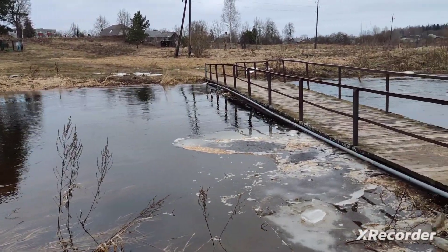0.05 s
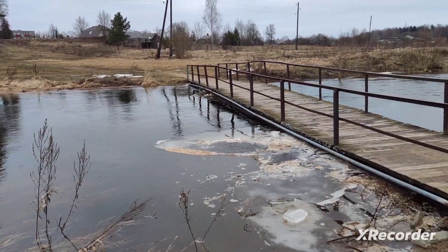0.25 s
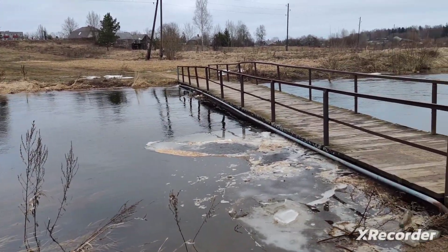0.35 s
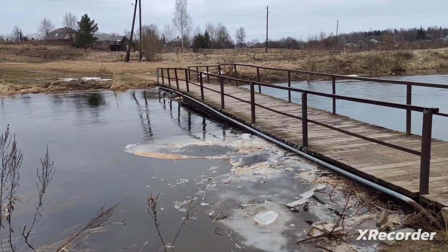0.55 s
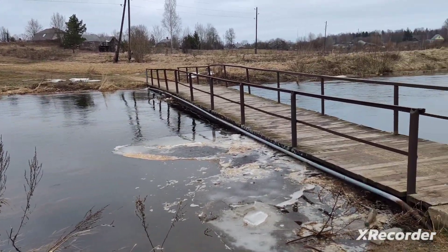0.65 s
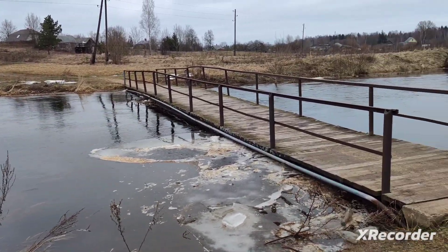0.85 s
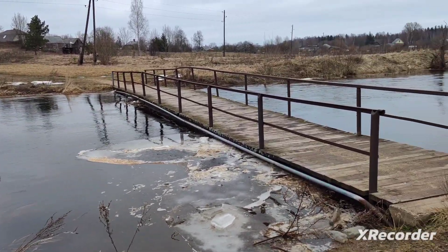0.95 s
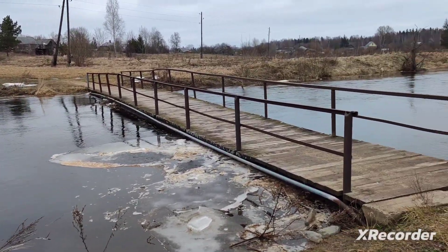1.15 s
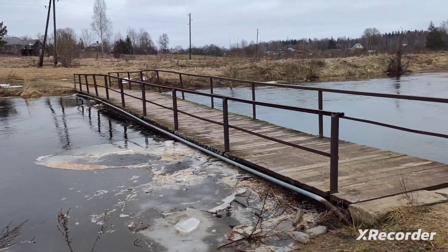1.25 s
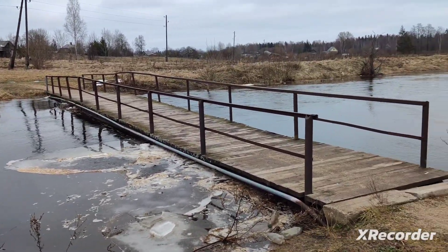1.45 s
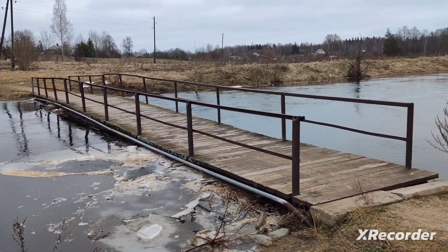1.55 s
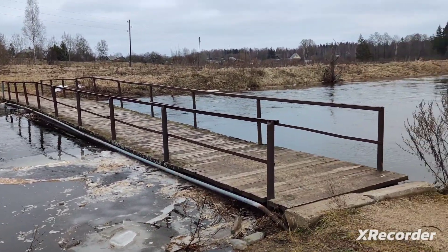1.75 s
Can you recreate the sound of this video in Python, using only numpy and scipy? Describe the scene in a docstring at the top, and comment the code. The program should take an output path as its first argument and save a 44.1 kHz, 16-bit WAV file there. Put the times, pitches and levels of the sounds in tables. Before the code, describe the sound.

A river flows past a footbridge with a soft, even rush and a few faint laps and bubbles. A wind gust rumbles and thumps on the microphone, moving from left to right, then eases, leaving the water.

```python
"""At a footbridge, a swollen river slides past: a soft, even rush of broadband noise, with a few
faint laps and tiny bubbles that ring as damped oscillators. A gust crosses the microphone from
the left port to the right; its turbulent pressure rumbles, and its eddies strike the ports as
brief thumps. A thin hiss lies under it all."""
import sys
import numpy as np
from scipy import signal
from scipy.fft import rfft, irfft, next_fast_len
from scipy.io import wavfile
from scipy.ndimage import uniform_filter1d, map_coordinates

SR = 44100
rng = np.random.default_rng(int(sys.argv[2]) if len(sys.argv) > 2 else 0)


def transcribe(signal):
    """Save signal, clipped to [-1, 1], as a 16-bit WAV file at the path in sys.argv[1]."""
    frames = np.atleast_2d(signal).T
    limited = np.clip(frames, -1, 1)
    pcm = np.round(limited * 32767).astype(np.int16)
    wavfile.write(sys.argv[1], SR, pcm)


N = 79380
TIME = np.arange(N) / SR

# Spectra of the hiss and the water (frequency [Hz], relative spectral density [dB])
HISS_SPECTRUM = [(1000, -5.5), (7500, -7.5), (9000, -5), (12000, -4), (15500, -3)]
CURRENT_SPECTRUM = [(40, -10), (140, 2.9), (195, 8.4), (230, 4.62), (280, 7), (370, 1), (500, 0),
                    (750, -.5), (1000, -2.3), (1500, -6.5), (1900, -9.5), (2300, -15), (3200, -22),
                    (4500, -26), (8000, -38)]
RIPPLE_SPECTRUM = [(400, -29.5), (1200, -5.5), (2000, 9), (2900, 2), (3600, -1), (5000, -17.5), (9000, -57)]
FIZZ_SPECTRUM = [(1000, -5), (3000, -3), (4600, -2), (5600, -0.5), (6400, 0.5), (6900, -4.5), (7400, -12.5),
                 (9000, -46.5)]
# Envelopes of the hiss, the ripples near the bank and the fizz (time [s], level [dB])
HISS_ENVELOPE = [(0, -68.5), (.3, -71), (.45, -71), (.66, -69), (.8, -70.5), (1, -71), (1.25, -69.7),
                 (1.8, -70.5)]
RIPPLE_ENVELOPE = [(0, -76), (.25, -71.5), (.45, -70.5), (.72, -74.5), (.9, -73.5), (1.33, -74), (1.5, -77),
                   (1.8, -87)]
FIZZ_ENVELOPE = [(0, -65.5), (.07, -70), (.5, -72), (.9, -73), (1.02, -72), (1.12, -69.5), (1.24, -71),
                 (1.4, -72.5), (1.52, -70.5), (1.63, -70.5), (1.72, -72.5), (1.8, -73)]
# Slow swell of the current (time [s], gain [dB])
CURRENT_SWELL = [(0, 0), (.5, 0.53), (.9, 0.03), (1.33, 1), (1.5, -1), (1.8, -0.5)]
# Likeness of the water's sound at the two ears (frequency [Hz], correlation [0-1])
WATER_CORRELATION = [(100, 0.8), (290, 0.96), (640, 0.17), (1400, 0.022), (3000, 0.14), (7000, 0.045)]
# Laps near the bank (peak time [s], relative level [dB], centre frequency [Hz], rise time [s])
BANK_LAPS = [(0.235, -54.5, 2160, 0.0038), (0.712, -57, 2640, 0.0044), (1.004, -57.5, 3220, 0.0026),
             (1.339, -58, 2000, 0.0098), (1.619, -51, 1020, 0.0034)]
# Spectra of the wind's turbulent pressure (frequency [Hz], relative spectral density [dB])
SWAY_SPECTRUM = [(8, -12), (30, -2), (45, -7.5), (80, -9), (300, -61.5), (1000, -120)]
RUMBLE_SPECTRUM = [(10, -2), (25, -3), (50, 7), (75, 4), (110, 2), (175, -7.5), (250, -21.5), (350, -32),
                   (550, -42), (1500, -120)]
FLUTTER_SPECTRUM = [(50, -13), (105, -6.5), (180, 17.5), (260, -3.5), (380, -20.5), (520, -32.5),
                    (750, -48), (1500, -120)]
RASP_SPECTRUM = [(120, -25.5), (230, -8), (300, 5), (400, -8.5), (520, -24.5), (720, -22), (900, -37.5),
                 (2000, -120)]
# Envelope of the rumble at each port (time [s], level [dB])
RUMBLE_LEFT = [(0, -40.5), (.12, -53), (.19, -34), (.265, -39), (.31, -28.5), (.36, -42.5), (.405, -26),
               (.46, -28.5), (.49, -37), (.535, -19.5), (.575, -32.5), (.62, -24.5), (.68, -43.5),
               (.71, -30), (.76, -44.5), (.95, -48), (1.04, -36.5), (1.11, -47), (1.33, -46.5), (1.43, -39),
               (1.6, -52), (1.8, -50)]
RUMBLE_RIGHT = [(0, -64), (.08, -40.5), (.22, -48), (.33, -46), (.47, -45.5), (.56, -38.5), (.63, -36),
                (.66, -36), (.69, -34), (.745, -35.5), (.8, -43.5), (1.05, -54), (1.3, -47), (1.4, -47.5),
                (1.5, -41), (1.6, -47.5), (1.71, -51), (1.8, -50)]
# Eddies striking the ports (time [s], thump peak [dB], centre frequency [Hz],
# Gaussian half-width [s], rasp level [dB], port [0 left, 1 right])
EDDY_STRIKES = [(0.241, -28.5, 97, 0.0061, -49, 0), (0.301, -22.5, 118, 0.0046, -51, 0),
                (.414, -21.5, 54.6, 0.0064, -47, 0), (0.439, -7, 175.6, 0.0029, -37, 0),
                (0.5013, -16.5, 147, 0.0039, -42, 0), (0.5133, -15, 200.3, 0.0061, -25.5, 0),
                (0.5475, -12.5, 95, 0.0047, -33.5, 0), (0.5641, -19, 136, 0.0056, -50, 0),
                (0.597, -17, 92, 0.011, -53, 0), (0.651, -25.5, 139.5, 0.0042, -48, 1),
                (0.663, -17.5, 113, 0.0014, -53, 0), (0.679, -20.5, 127, 0.0061, -36, 1),
                (0.698, -21, 121, 0.002, -39, 1), (.859, -27.5, 95, 0.0032, -62, 0),
                (1.342, -28.5, 158, 0.0012, -52, 0)]


def amp(db):
    """Amplitude grows tenfold for every 20 dB."""
    return 10 ** (np.asarray(db) / 20)


def unit(x):
    """Normalisation to an rms of 1."""
    return x / np.sqrt(np.mean(x ** 2) + 1e-20)


def pan(db):
    """Interaural level difference: the left gains db and the right loses as much."""
    return amp([[db], [-db]])


def along(points, hz):
    """Interpolation of (frequency, value) points on a logarithmic frequency axis."""
    frequencies, values = np.transpose(points)
    return np.interp(np.log(hz + 1), np.log(frequencies + 1), values)


def envelope(points):
    """Linear interpolation of (time, level) points at every sample."""
    return np.interp(TIME, *np.transpose(points))


def wobble(knots_per_s):
    """Spline interpolation of random knots gives a smooth fluctuation."""
    return map_coordinates(rng.standard_normal(400), [TIME * knots_per_s], mode="mirror")


def filtered(x, response):
    """Linear filtering multiplies the spectrum by a frequency response."""
    size = next_fast_len(N + 8192)
    return irfft(rfft(x, size) * response(np.fft.rfftfreq(size, 1 / SR)), size)[..., :N]


def rush(spectrum, correlation, patchy_db):
    """Noise with random patches of gain; its mid-to-side ratio sets the interaural correlation."""
    cells = signal.stft(rng.standard_normal((2, N)), nperseg=512)[2]
    patches = uniform_filter1d(rng.standard_normal(cells.shape[1:]), size=5, axis=0)  # over frequency
    patches = uniform_filter1d(patches, size=10, axis=1)  # over time
    pair = signal.istft(cells * amp(patchy_db * unit(patches)), nperseg=512)[1][:, :N]

    def response(hz):
        angle = np.arccos(np.clip(along(correlation, hz), -1, 1)) / 2
        return amp(along(spectrum, hz)) * np.array([np.cos(angle), np.sin(angle)])

    mid, side = filtered(pair, response)
    return unit(np.array([mid + side, mid - side]))


def turbulence(spectrum, steady_s=0.042):
    """Random pressure fluctuation, divided by its running rms so that its level stays steady."""
    noise = unit(filtered(rng.standard_normal(N), lambda hz: amp(along(spectrum, hz))))
    span = int(steady_s * SR)
    power = uniform_filter1d(uniform_filter1d(noise ** 2, span), span // 2)
    return unit(noise / np.sqrt(np.abs(power) + 1e-6))


def hiss():
    """Thin noise, almost uncorrelated between the ears, is heard as diffuse."""
    noise = rush(HISS_SPECTRUM, correlation=[(5000, 0.0098)], patchy_db=0.5)
    return amp(envelope(HISS_ENVELOPE)) * pan(0.5) * noise


def river():
    """Incoherent sources add in power: the broad rush of the current, ripples and a fine fizz."""
    current = amp(-55 + envelope(CURRENT_SWELL)) * rush(CURRENT_SPECTRUM, WATER_CORRELATION, 1.5)
    ripples = amp(envelope(RIPPLE_ENVELOPE)) * rush(RIPPLE_SPECTRUM, WATER_CORRELATION, 3)
    fizz = amp(envelope(FIZZ_ENVELOPE)) * rush(FIZZ_SPECTRUM, WATER_CORRELATION, 1.85)
    return pan(0.22) * current + ripples + pan(1.9) * fizz


def bubbles(count=320, typical_db=-73.5, typical_hz=1323, decay_cycles=6.5, pitch_rise=0.13):
    """Each bubble is a damped oscillator that rings for a few cycles as its pitch rises."""
    out = np.zeros((2, N + SR))
    t = np.arange(SR // 20) / SR
    starts = rng.integers(0, N, count)
    for start, (pitch, strength, side) in zip(starts, rng.standard_normal((count, 3))):
        cycles = t * typical_hz * np.exp(.45 * pitch)
        age = cycles / decay_cycles
        phase = 2 * np.pi * cycles * (1 + pitch_rise * np.tanh(age / 2))
        ring = np.sin(phase) * np.exp(-age) * (1 - np.exp(-cycles))
        out[:, start:start + len(t)] += amp(typical_db + 2.2 * strength) * pan(side) * ring
    return out[:, :N]


def laps(log_bandwidth=0.28):
    """Each lap is a transient of band-limited noise, largely coherent between the ears."""
    out = np.zeros((2, N))
    for peak_s, db, centre_hz, rise_s in BANK_LAPS:
        age = np.maximum((TIME - peak_s) / rise_s + 1, 0)
        band = lambda hz: np.exp(-.5 * (np.log((hz + 1) / centre_hz) / log_bandwidth) ** 2)
        noise = rng.standard_normal(N) + 0.32 * rng.standard_normal((2, N))
        splash = unit(filtered(noise, band))
        out += amp(db) / 2 * (age * np.exp(1 - age)) ** 2 * splash
    return out


def wind(port_envelope, buffet_db=0.56, strong_gust_db=-24):
    """Turbulent pressure at a port: slow sway and brighter flutter follow the rumble by power laws."""
    rumble_db = envelope(port_envelope) + buffet_db * wobble(knots_per_s=21)
    excess_db = rumble_db - strong_gust_db
    sway = amp(-38.5 + 0.39 * excess_db) * turbulence(SWAY_SPECTRUM)
    rumble = amp(rumble_db) * turbulence(RUMBLE_SPECTRUM)
    flutter = amp(-36.5 + 0.92 * excess_db) * turbulence(FLUTTER_SPECTRUM)
    return sway + rumble + flutter


def eddies(edge_hz=458, edge_half_width_s=0.002):
    """Each eddy is a Gaussian pressure pulse: a thump, a rasp of torn air and a nonlinear hard edge."""
    out = np.zeros((2, N))
    torn_air = turbulence(RASP_SPECTRUM)
    for peak_s, db, hz, half_width_s, rasp_db, port in EDDY_STRIKES:
        t = TIME - peak_s
        pulse = np.exp(-.5 * (t / half_width_s) ** 2)
        thump = amp(db) * pulse * np.cos(2 * np.pi * hz * t)
        rasp = amp(rasp_db) * pulse * torn_air
        edge_gain = amp(-5.5 + 3.03 * db)  # nearly cubic, so only the strongest eddies sound hard
        edge = edge_gain * np.exp(-.5 * (t / edge_half_width_s) ** 2) * np.cos(2 * np.pi * edge_hz * t)
        out[port] += rasp - thump - edge
    return out


def scene():
    """Superposition: the pressures of water, hiss and wind add at each port."""
    background = river() + bubbles() + laps() + hiss()
    return background + eddies() + np.array([wind(RUMBLE_LEFT), wind(RUMBLE_RIGHT)])


def record(dry):
    """An ideal low-pass filter limits the bandwidth to 15.7 kHz."""
    return filtered(dry, lambda hz: hz < 15700)


dry = scene()
out = record(dry)
transcribe(out)
```